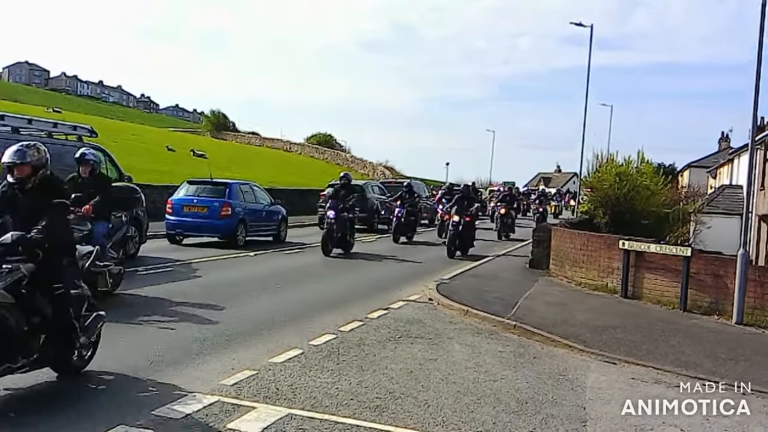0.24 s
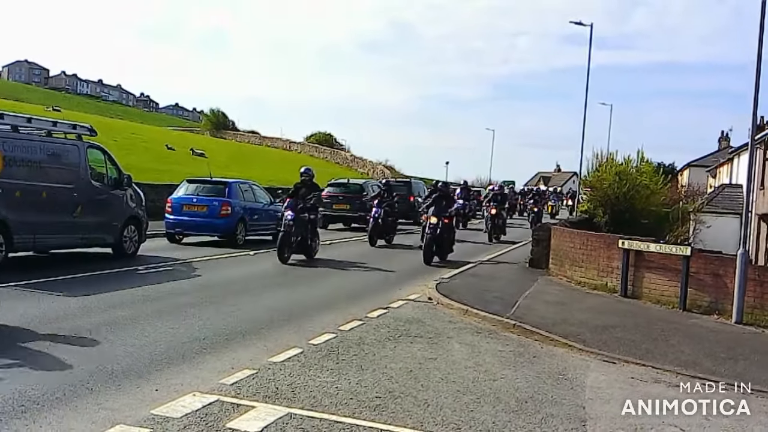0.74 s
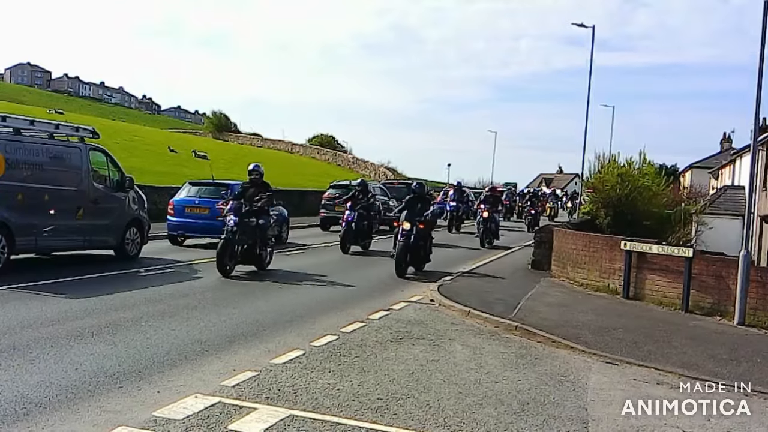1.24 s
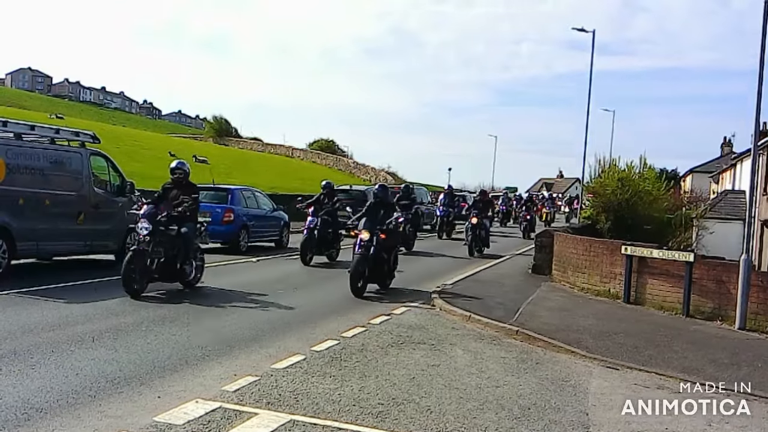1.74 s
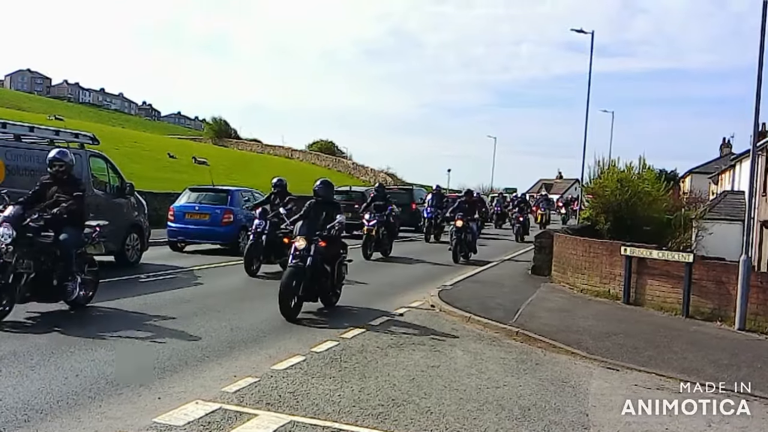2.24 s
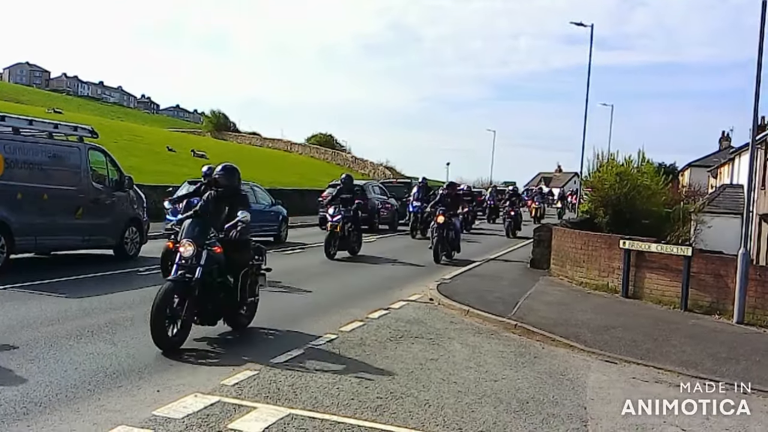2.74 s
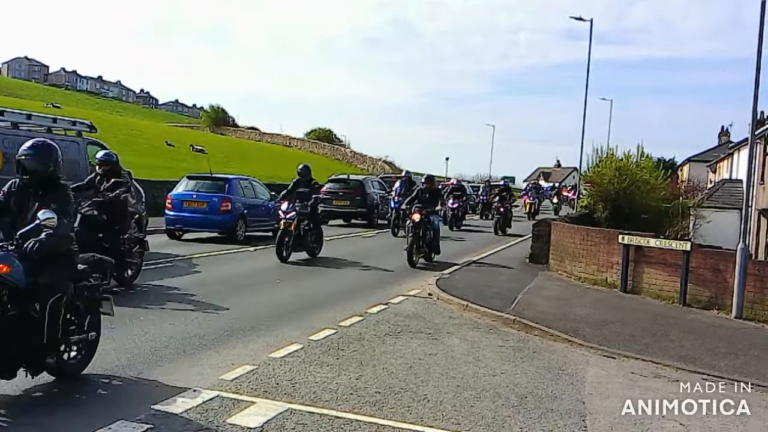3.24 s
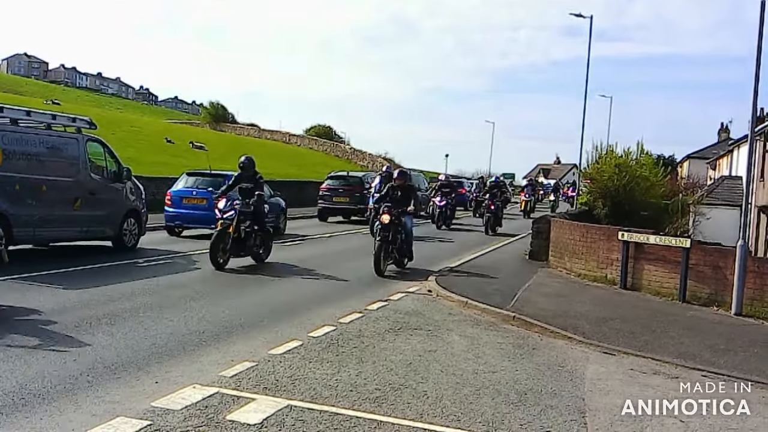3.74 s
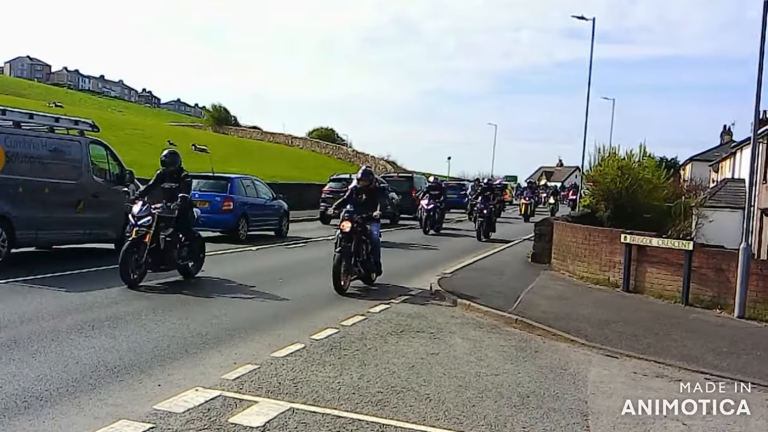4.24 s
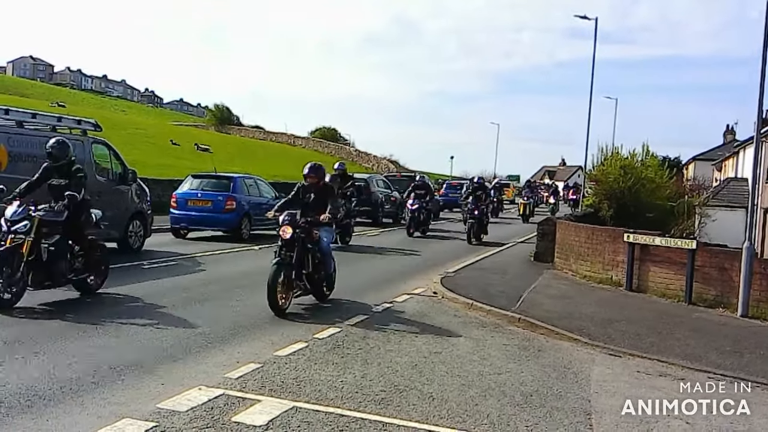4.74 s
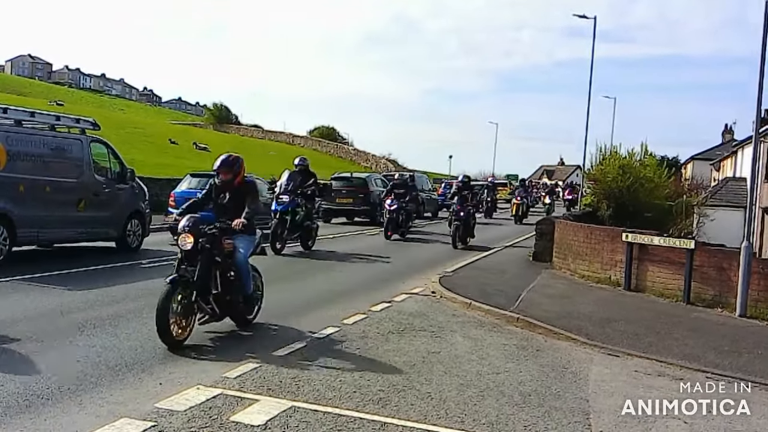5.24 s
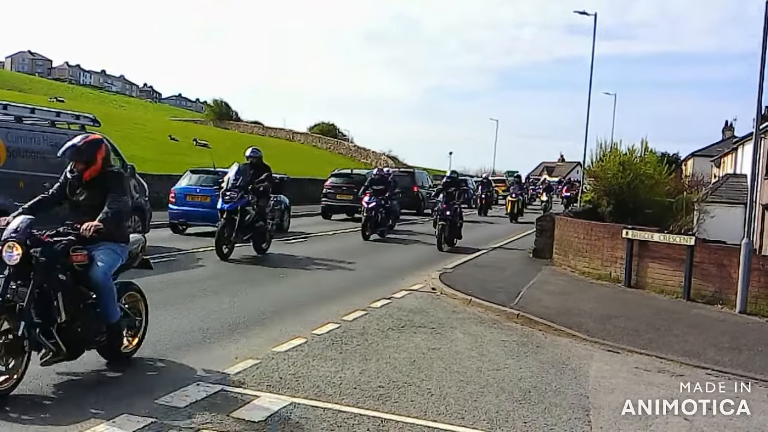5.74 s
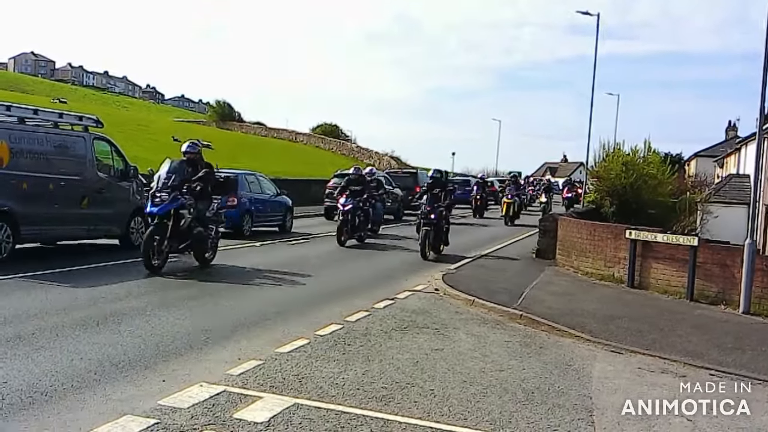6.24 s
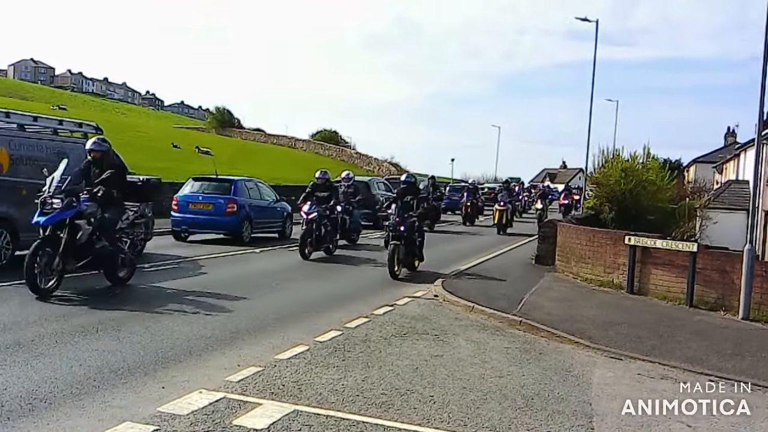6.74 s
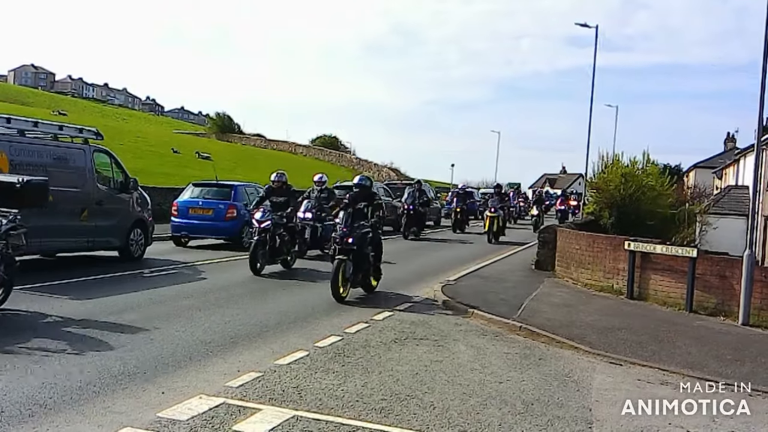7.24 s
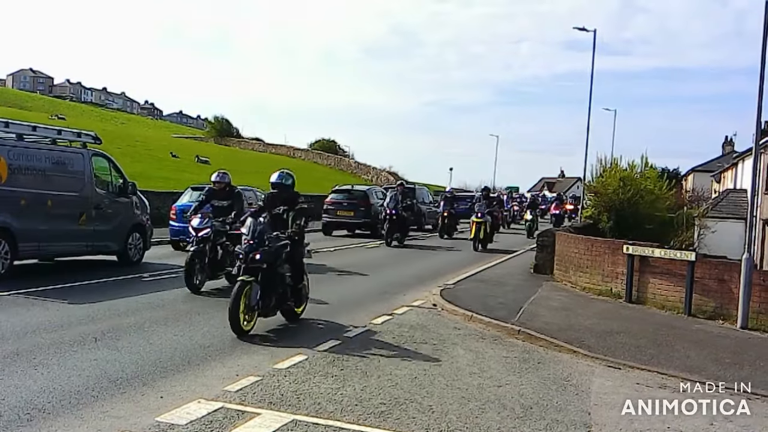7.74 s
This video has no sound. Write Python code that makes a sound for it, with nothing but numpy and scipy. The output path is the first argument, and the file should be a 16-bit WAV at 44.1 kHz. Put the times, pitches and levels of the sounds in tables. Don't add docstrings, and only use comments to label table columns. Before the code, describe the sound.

Continuous throbbing rumble from many motorcycle engines, with tyre roar and airy hiss swelling at each pass. The loudest bikes come first, opening the throttle within the first second. A brief growl with faint valve ticking follows, then lower droning engines, a slightly rising whine and metallic chain clicks. Towards the end a bike revs higher beside a slow, popping twin. Outdoors at the roadside, on a small, coloured, mildly distorted microphone with dull, uneven highs.

```python
import sys
import numpy as np
from scipy import signal
from scipy.fft import rfft, irfft
from scipy.io import wavfile
from scipy.ndimage import uniform_filter1d

SR = 44100
rng = np.random.default_rng(int(sys.argv[2]) if len(sys.argv) > 2 else 0)


def level_to_linear(level):
    exponent = np.asarray(level, float) / 20
    return 10 ** exponent


def generate_wav(signal):
    frames = np.transpose(np.atleast_2d(signal))
    scaled = np.clip(frames, -1, 1) * 32767
    pcm = np.round(scaled).astype(np.int16)
    wavfile.write(sys.argv[1], SR, pcm)


N = 352800

# share of the cycle, level/dB
TWIN_FIRES = [(0, 0), (.5, -4)]
# f/Hz, width/Hz, level/dB
DULL_BARK = [(783, 120, 14), (1650, 670, -1.5), (2690, 3600, -19.5)]
# t/s, f/Hz (cycles per second)
FOUR_SPEED = [(1.5, 16.83), (1.8, 16.1), (2.1, 17), (2.25, 17.37), (2.55, 17.24), (2.85, 16.88),
              (3.15, 15.45)]
FOUR_FIRED_S = 2.1765


def rms_one(x):
    return x / np.sqrt(np.mean(x ** 2) + 1e-20)


def in_time(rows):
    s, *columns = np.transpose(rows)
    return [np.interp(np.arange(N) / SR, s, c) for c in columns]


def span(rows, fade_s):
    t, first, last = np.arange(N) / SR, rows[0][0], rows[-1][0]
    rise = np.clip((t - first) / fade_s, 0, 1) if first > .05 else 1
    fall = np.clip((last - t) / fade_s, 0, 1) if last < N / SR - .05 else 1
    return rise * fall


def held(start, end, rise_s, fall_s):
    corners = np.maximum.accumulate([start - rise_s, start, end, end + fall_s])
    return np.interp(np.arange(N) / SR, corners, [0, 1, 1, 0])


def drift(rate, live=slice(None)):
    r = np.exp(-80 * np.pi * rate / SR)
    slow = signal.lfilter([1], [1, -2 * r, r * r], rng.standard_normal(N // 40 + 2002))[2000:]
    return np.interp(np.arange(N)[live] / 40, np.arange(len(slow)), rms_one(slow))


def resonate(x, hz, width_hz):
    r = np.exp(-np.pi * width_hz / SR)
    top = np.array([1, 0, -1]) * (1 - r * r) / 2
    return signal.lfilter(top, [1, -2 * r * np.cos(2 * np.pi * hz / SR), r * r], x)


def coloured(x, spectrum):
    hz, db = np.transpose(spectrum)
    bins = np.log(np.fft.rfftfreq(N, 1 / SR) + 1)
    gain = level_to_linear(np.interp(bins, np.log(hz), db, left=-80, right=-80))
    return rms_one(irfft(rfft(x) * gain, N))


def puffs(cycle, fires, decay_s, uneven_db):
    kicks = np.zeros(N)
    for share, db in fires:
        at = np.flatnonzero(np.diff(np.floor(cycle - share)))
        kicks[at] += level_to_linear(db + uneven_db * rng.standard_normal(N // 400)[:len(at)])
    return kicks, signal.lfilter([1], [1, -np.exp(-1 / (decay_s * SR))], kicks)


def going_by(closest_s, reach_s):
    return 1 / (1 + ((np.arange(N) / SR - closest_s) / reach_s) ** 2)


def with_passes(far_db, order, reach_s):
    # closest t/s, drone level/dB, tyre roar level/dB, hiss level/dB
    riders = [
        (.1, -14.5, -27, -34),
        (.6, -18, -24, -34),
        (1.05, -34.5, -27.5, -34),
        (2.2, -21, -32.5, -36.5),
        (3.85, -30.5, -42, -40.5),
        (4.55, -31.5, -45.5, -41.5),
        (5.8, -31.5, -32.5, -39.5),
        (6.5, -27.5, -32, -39.5),
        (7.25, -24, -33, -39),
    ]
    power = level_to_linear(far_db) ** 2
    power = power + sum(level_to_linear(row[order]) ** 2 * going_by(row[0], reach_s) ** 2 for row in riders)
    return 10 * np.log10(power)


def column():
    # t/s, rumble level/dB
    bunching = [(0, -9), (.25, -9), (.6, -16), (1, -15), (1.25, -9.5), (1.75, -19), (2.15, -13),
                (2.4, -14.5), (3, -16), (3.4, -16), (4, -17.5), (4.5, -17.5), (5, -16), (5.4, -17),
                (6.1, -15), (6.6, -17), (7.2, -14.5), (7.8, -16.5)]
    # f/Hz, level/dB per Hz
    rumble_spectrum = [(15, -75), (25, -42), (81, -10.5), (97, -14), (130, -1.5), (148, 3.5), (198, -4),
                       (297, -1), (339, -4.5), (460, -12.5), (600, -77), (1010, -120)]
    drone_spectrum = [(380, -5.5), (440, -4), (600, -2.5), (800, -2.5), (950, -11), (1100, -34)]
    roar_spectrum = [(850, -15.5), (1000, -5), (1250, -1), (1600, -1.5), (2500, -11), (2850, -8.5),
                     (3200, -29.5)]
    hiss_spectrum = [(2600, -28), (3000, 3), (4500, -7), (6500, -16), (8500, -15), (10500, -25),
                     (11500, -19)]
    rumble_db, = in_time(bunching)
    far_drone_db = -27 + .17 * (rumble_db - rumble_db.mean())
    drone_db = with_passes(far_drone_db, order=1, reach_s=.49)
    roar_db = with_passes(-29.5, order=2, reach_s=.51)
    hiss_db = with_passes(-41, order=3, reach_s=.51)
    kicks, throb = np.zeros(N), np.zeros(N)
    for rate in rng.uniform(14, 45, size=12):
        cycle = np.cumsum(rate * (1 + .04 * drift(.3))) / SR
        kick, puff = puffs(cycle, [(0, -5), (.42, -8)], decay_s=.0032, uneven_db=2.5)
        nearness = level_to_linear(5.9 * drift(.29))
        kicks += nearness * kick
        throb += nearness * puff
    kicks = rms_one(kicks - kicks.mean())
    throb = throb / throb.mean()
    soft_throb = 1 + .3 * np.sqrt(throb)
    white = rng.standard_normal((4, N))
    rumble = level_to_linear(rumble_db - 3.5) * coloured(.9 * kicks + white[0], rumble_spectrum)
    drone = level_to_linear(drone_db - 2.5) * coloured(.43 * kicks + white[1], drone_spectrum)
    roar = level_to_linear(roar_db - .5) * coloured((1 + .094 * throb) * white[2], roar_spectrum)
    hiss = level_to_linear(hiss_db - 2.58 + .87 * drift(26)) * coloured(soft_throb * white[3], hiss_spectrum)
    return rumble + drone + roar + hiss


def engine(throttle, voice, speed, orders, fires, bark, fired_s, rough_db, noisy):
    rate, = in_time(speed)
    shut = 1 - held(*throttle)
    exhaust_db = voice[0] - voice[1] * shut
    bark_db = voice[2] - voice[3] * shut
    cycle = np.cumsum(rate) / SR
    cycle = cycle - cycle[round(fired_s * SR)]
    live = slice(round(speed[0][0] * SR), round(speed[-1][0] * SR))
    tones = np.zeros(N)
    for k, db in orders:
        lined_up = np.angle(sum(level_to_linear(d) * np.exp(-2j * np.pi * k * share) for share, d in fires))
        level = level_to_linear(db + rough_db * drift(4.7, live))
        phase = 2 * np.pi * k * cycle[live] + lined_up + .3 * drift(4.0, live)
        tones[live] += level * np.cos(phase)
    tones /= np.sqrt(np.mean(tones[live] ** 2))
    kicks, puff = puffs(cycle, fires, decay_s=.003, uneven_db=1.2)
    blows = rms_one(kicks) + noisy * rms_one(puff * rng.standard_normal(N))
    blows = signal.sosfilt(signal.butter(2, 3500, fs=SR, output="sos"), blows)
    knock = np.zeros(N)
    for i, (hz, width_hz, db) in enumerate(bark):
        knock += level_to_linear(db) * (-1) ** i * resonate(blows, hz, width_hz)
    return span(speed, .14) * (level_to_linear(exhaust_db) * tones + level_to_linear(bark_db) * rms_one(knock))


def twin():
    # t/s, f/Hz (cycles per second)
    speed = [(0, 21.93), (.33, 21.95), (.6, 22.07), (1, 22.09), (1.15, 21.74)]
    # multiple of the cycle, level/dB
    orders = [(1, -46), (2, -26), (3, -26), (4, -5), (5, -5), (6, -21), (7, -1), (8, -33), (9, 3), (10, -5),
              (11, -21), (12, -1.5), (13, -1.5), (14, -3), (15, -19), (16, -12.5), (17, -37), (18, -7),
              (19, -19), (20, -20), (21, -29.5), (22, -5.5), (23, -14), (24, -16), (25, -16), (26, -34),
              (27, -34)]
    # f/Hz, width/Hz, level/dB
    bark = [(650, 160, -5), (775, 130, 0), (1000, 350, -8), (1500, 500, -17)]
    return engine((.14, .788, .35, .16), (-11, 5, -17, 13), speed, orders, TWIN_FIRES, bark,
                  fired_s=.2085, rough_db=1.2, noisy=.62)


def side_bike():
    # t/s, f/Hz (cycles per second)
    speed = [(0, 28.03), (.55, 28.34), (1.1, 28.53)]
    # multiple of the cycle, level/dB
    orders = [(2, -39), (3, -14.5), (4, -12), (5, -4.5), (6, -20), (8, -9.5), (9, -12), (10, -23), (11, -8),
              (12, -8.5), (13, -5), (14, -34)]
    return engine((.49, .83, .38, .42), (-20, 2.5, -35, 4), speed, orders, TWIN_FIRES, DULL_BARK,
                  fired_s=.5, rough_db=8.0, noisy=.43)


def rasp():
    bands = [
        (.5, 3450, 300, -28.5),
        (.85, 4400, 500, -32),
        (7.1, 2750, 150, -36),
        (.85, 2550, 50, -27),
    ]
    reach_s = .3
    flutter = level_to_linear(2.5 * drift(30))
    out = 0
    for closest_s, centre_hz, climb_hz, db in bands:
        hz = centre_hz + climb_hz * np.tanh((np.arange(N) / SR - closest_s) / reach_s)
        grain = rms_one(resonate(rng.standard_normal(N) * level_to_linear(2 * drift(60)), 200, 600))
        carrier = np.cos(2 * np.pi * np.cumsum(hz) / SR)
        out = out + level_to_linear(db) * going_by(closest_s, reach_s) ** 2 * grain * carrier
    return flutter * out


def four():
    # multiple of the cycle, level/dB
    orders = [(1, -45), (2, -37), (3, -23), (4, -14.5), (5, -9), (6, -6.5), (7, -34), (8, -2), (9, -3.5),
              (10, 2), (11, -6), (12, -2), (13, -1.5), (14, 2), (15, -22), (16, -3), (17, -7.5), (18, 1.5),
              (19, -16), (20, -5.5), (21, -19), (22, -5), (23, -5), (24, -12), (25, -27), (26, -15)]
    # share of the cycle, level/dB
    fires = [(0, 0), (.3, -2), (.5, -1), (.77, -6)]
    # f/Hz, width/Hz, level/dB
    bark = [(710, 68, -2), (1600, 710, 0), (2470, 1200, 0), (3400, 1100, -7.5)]
    return engine((1.97, 2.28, .24, .37), (-14.5, 1.5, -27, 12.5), FOUR_SPEED, orders, fires, bark,
                  fired_s=FOUR_FIRED_S, rough_db=1.8, noisy=.48)


def tappet():
    cycle = np.cumsum(in_time(FOUR_SPEED)[0]) / SR
    cycle = cycle - cycle[round(FOUR_FIRED_S * SR)]
    _, puff = puffs(cycle, [(.9, 0)], decay_s=.009, uneven_db=1.5)
    ticks = puff * rng.standard_normal(N)
    ticks = rms_one(resonate(resonate(ticks, 3450, 500), 3450, 500))
    return level_to_linear(-43) * held(2.55, 2.7, .12, .12) * ticks


def far_bike():
    # t/s, f/Hz (cycles per second)
    speed = [(3.1, 27.83), (4, 28.94), (4.3, 29.86), (4.9, 31)]
    # multiple of the cycle, level/dB
    orders = [(1, -35), (2, -6), (3, 2.5), (4, 11), (5, 3), (6, -10), (7, 3), (8, -29), (9, -7), (10, -17),
              (11, -26), (12, -29)]
    return engine((4.37, 4.9, .26, .4), (-23, 5, -43, 3), speed, orders, TWIN_FIRES, DULL_BARK,
                  fired_s=4, rough_db=4.0, noisy=.99)


def whine():
    # t/s, f/Hz
    pitch = [(3.65, 1455), (3.85, 1480), (4.1, 1505), (4.45, 1540), (4.95, 1575)]
    hz, = in_time(pitch)
    level_db = -32.5 - 6 * (1 - held(3.75, 4.45, .1, .2))
    level = level_to_linear(level_db + 2.2 * drift(7.7))
    tone = np.sin(2 * np.pi * np.cumsum(hz + 4.4 * drift(21.3)) / SR)
    return span(pitch, .055) * level * tone


def cruiser():
    # t/s, f/Hz (cycles per second)
    speed = [(3.7, 34.66), (4.28, 35.87), (4.68, 34.95), (5.07, 35.53), (5.3, 35.2), (5.65, 34.9)]
    # multiple of the cycle, level/dB
    orders = [(1, -27), (2, -9), (3, -1), (4, 0), (5, 2.5), (6, -6), (7, -13), (8, 3), (9, -13), (10, -28)]
    return engine((5.0, 5.35, .61, .32), (-24, 2, -37, 0), speed, orders, TWIN_FIRES, DULL_BARK,
                  fired_s=4.5, rough_db=1.0, noisy=.43)


def chain():
    # t/s, peak level/dB
    ticks = [(4.0173, -40), (4.0782, -45), (4.1734, -43), (4.1959, -41), (4.284, -40), (4.3111, -37),
             (4.5007, -42), (4.5331, -40), (4.5576, -33), (4.574, -32), (4.603, -39), (4.6494, -39),
             (4.6788, -37), (4.6992, -37), (4.7382, -30), (4.7741, -43)]
    clicks = np.zeros(N)
    clicks[[round(s * SR) for s, db in ticks]] = level_to_linear(np.array(ticks)[:, 1] + 25)
    return resonate(resonate(clicks + 1e-18, 6600, 700), 7000, 700)


def revver():
    # t/s, f/Hz (cycles per second)
    speed = [(5.6, 34.9), (5.92, 35.32), (6.24, 36.58), (6.72, 39.52), (7.04, 41.11), (7.52, 42.21),
             (8, 41.7)]
    # multiple of the cycle, level/dB
    orders = [(1, -40), (2, -9), (3, 0), (4, -2), (5, -3), (6, -17), (7, -13), (8, -12), (9, -10)]
    # f/Hz, width/Hz, level/dB
    bark = [(837, 74, 8), (728, 99, 1), (2800, 1800, -14.5), (1450, 850, -10.5)]
    return engine((6.92, 7.33, .9, .5), (-18, 5, -26.5, 10.5), speed, orders, TWIN_FIRES, bark,
                  fired_s=7.04, rough_db=1.6, noisy=1.3)


def burbler():
    # t/s, f/Hz (cycles per second)
    speed = [(5.95, 15), (6.3, 16.3), (6.8, 16.2), (7.1, 24.8), (7.65, 19), (7.85, 22.5), (8, 16)]
    # t/s, low mode level/dB, high mode level/dB
    blips = [
        (6.33, -16.5, -19.5),
        (7.82, -18, -28),
    ]
    idle_low_db, idle_high_db = -27, -35.5
    low_db, high_db = idle_low_db, idle_high_db
    for s, blip_low_db, blip_high_db in blips:
        opening = held(s, s, .34, .54)
        low_db = low_db + (blip_low_db - idle_low_db) * opening
        high_db = high_db + (blip_high_db - idle_high_db) * opening
    rate, = in_time(speed)
    kicks, puff = puffs(np.cumsum(rate) / SR + .3, [(0, 0), (.35, -4)], decay_s=.02, uneven_db=1.5)
    blows = rms_one(kicks) + 2.3 * rms_one(puff * rng.standard_normal(N))
    low = rms_one(resonate(resonate(blows, 322, 50), 347, 50))
    high = rms_one(resonate(resonate(blows, 475, 35), 475, 35))
    return span(speed, .068) * (level_to_linear(low_db) * low + level_to_linear(high_db) * high)


def scene():
    opening = column() + twin() + side_bike() + rasp()
    middle = four() + tappet() + far_bike() + whine() + cruiser() + chain()
    ending = revver() + burbler()
    return (opening + middle + ending)[None]


def patchy_treble(x):
    # f/Hz, share of the time
    holes = [(5000, 0), (7000, .03), (8500, .12), (9800, .2), (10500, .35), (10900, .7), (11100, 1)]
    # from t/s, until t/s
    full_treble = [(.75, 1.1), (1.46, 1.55), (1.75, 1.85), (2.17, 2.2), (4.5, 4.76), (7.38, 7.45)]
    # t/s, step level/dB
    coarse = [(.28, 25), (.907, 25), (1.046, 25), (1.998, 21), (2.068, 21), (2.812, 20), (3.299, 19),
              (4.066, 19), (4.6, 18), (4.762, 18), (4.878, 19), (5.041, 19), (5.134, 19), (5.412, 19),
              (5.435, 19), (5.458, 19), (5.505, 20), (5.551, 19), (5.69, 18), (5.783, 18), (6.015, 20),
              (7.664, 19), (7.966, 19)]
    frame_size, grid, width = 1024, 74, 8
    n, k = np.arange(2 * frame_size), np.arange(frame_size)
    window = np.sin(np.pi * (n + .5) / (2 * frame_size))
    basis = window * np.cos(np.pi / frame_size * np.outer(k + .5, n + .5 + frame_size / 2))
    hz = (k + .5) * SR / (2 * frame_size)
    firsts = np.arange(grid, N - 2 * frame_size, frame_size)
    lines = x[firsts[:, None] + n] @ basis.T
    chance = uniform_filter1d(rng.standard_normal((len(firsts), frame_size // width)), size=4, axis=0)
    rank = chance.argsort(axis=0).argsort(axis=0)
    chance = np.repeat(rank / len(firsts), width, axis=1)
    share = np.tile(np.interp(hz, *np.transpose(holes)), (len(firsts), 1))
    middle_s = (firsts + frame_size) / SR
    for begin, end in full_treble:
        inside = abs(middle_s - (begin + end) / 2) < (end - begin) / 2
        share[np.ix_(inside, hz > 9800)] = .1
    lost = lines * (chance < share)
    slope_db = 1 - 5.3 * np.log2(np.maximum(hz, 500) / 1000)
    for s, step_db in coarse:
        frame = round((s * SR - grid) / frame_size) - 1
        step = level_to_linear(step_db + slope_db)
        lost[frame] = lines[frame] - step * np.round(lines[frame] / step)
    gone = 2 / frame_size * lost @ basis
    length = gone.size // 2
    out = x.copy()
    out[grid:grid + length] -= gone[:, :frame_size].ravel()
    out[grid + frame_size:grid + frame_size + length] -= gone[:, frame_size:].ravel()
    return out


def band_limit(x):
    return signal.sosfilt(signal.butter(12, 11390, fs=SR, output="sos"), x)


def record(dry):
    # f/Hz, width/Hz, level/dB
    housing = [(1182, 320, -7.5), (1624, 160, 4), (1953, 272, -14.5), (2468, 233, 10.5), (2900, 390, -6),
               (3800, 190, 3.5), (5110, 360, 7.5), (5840, 380, -4.5), (6700, 520, 7), (8440, 630, -4.5),
               (9400, 330, -5.5)]
    x = dry[0]
    for hz, width_hz, db in housing:
        wide = width_hz * max(1, level_to_linear(-db) ** .5)
        x = x + (level_to_linear(db) - 1) * resonate(x, hz, wide)
    x = 1.01 * np.tanh(x / 1.01)
    x = signal.sosfilt(signal.butter(2, 45, "high", fs=SR, output="sos"), x)
    mix = patchy_treble(np.clip(x, -1, 1))[None]
    return band_limit(mix)


dry = scene()
out = record(dry)
generate_wav(out)
```